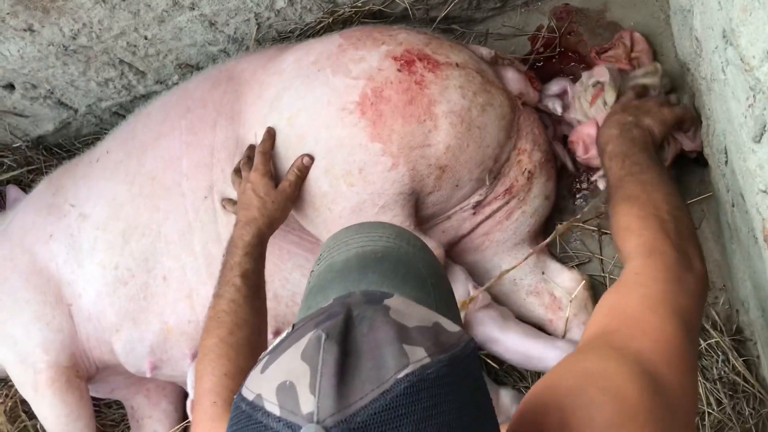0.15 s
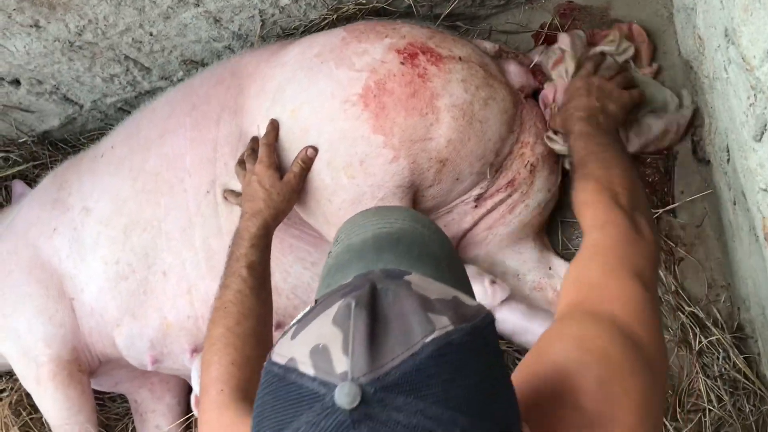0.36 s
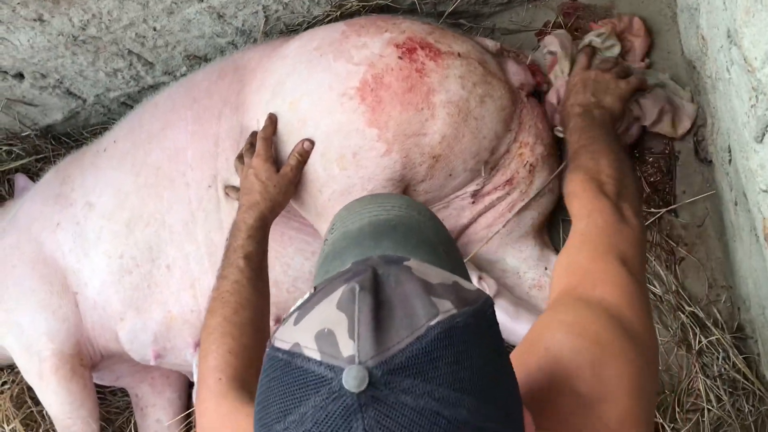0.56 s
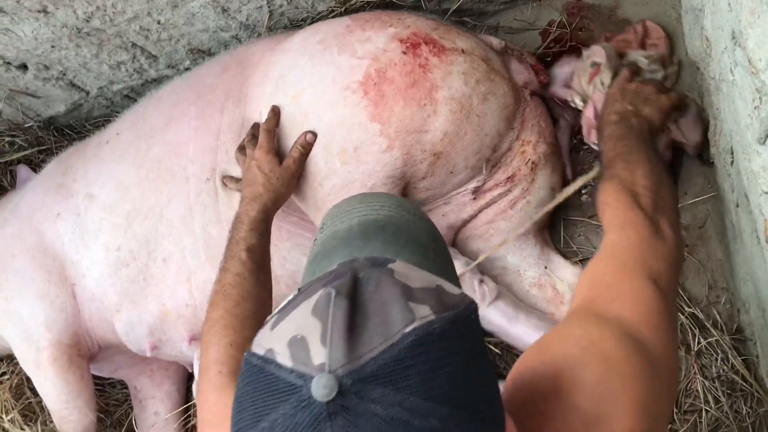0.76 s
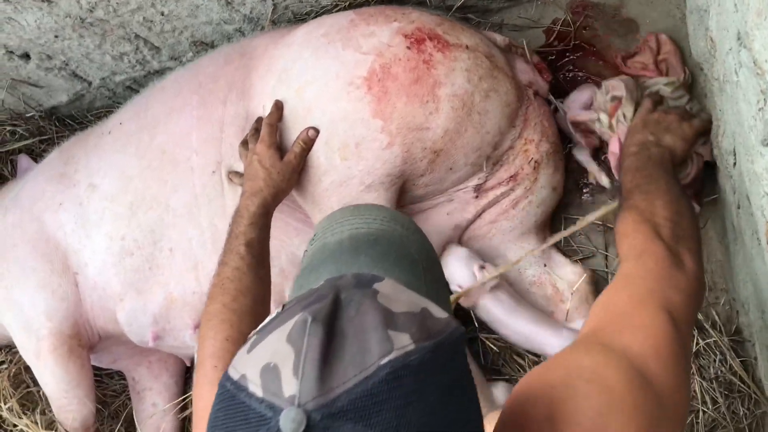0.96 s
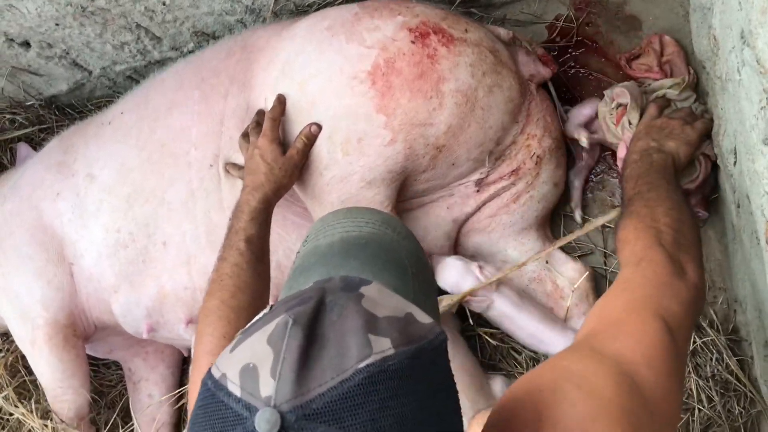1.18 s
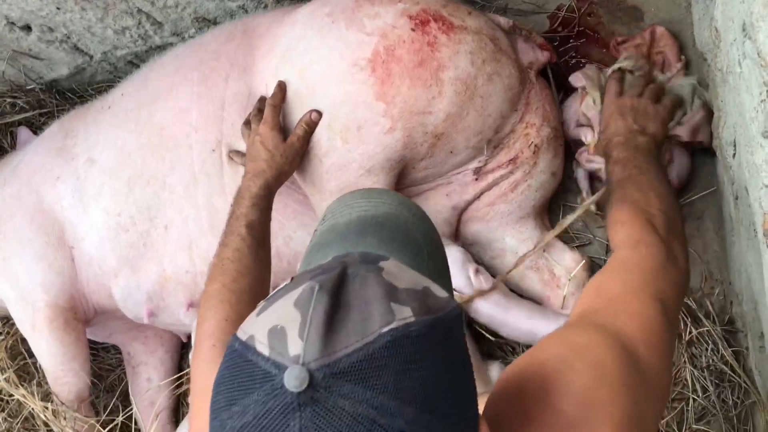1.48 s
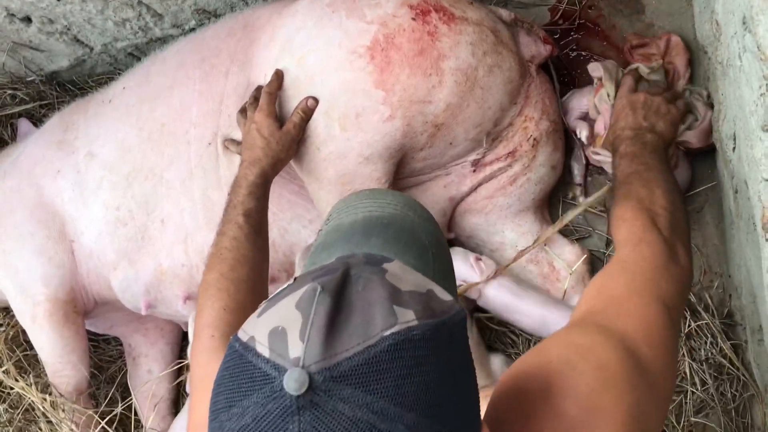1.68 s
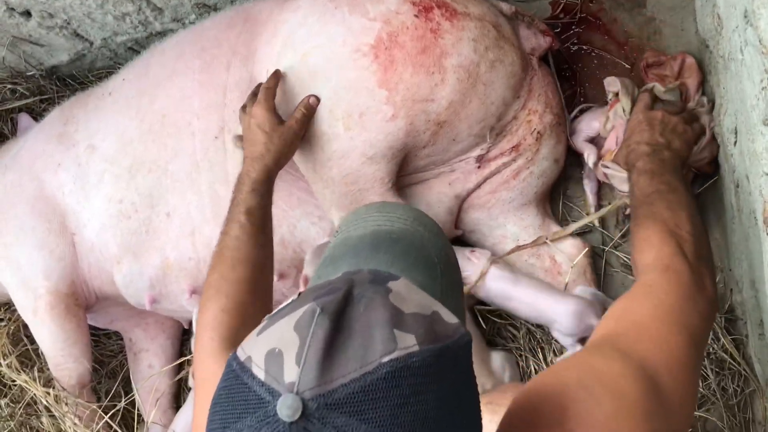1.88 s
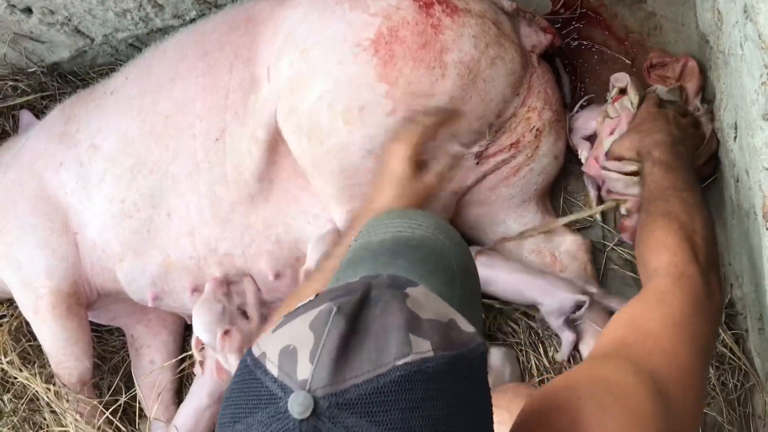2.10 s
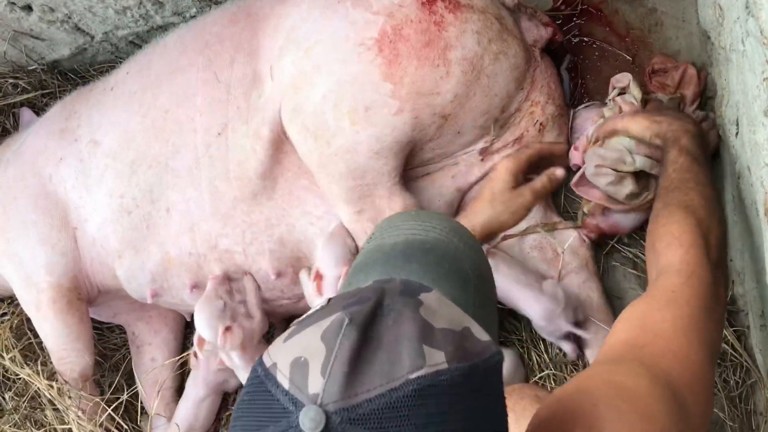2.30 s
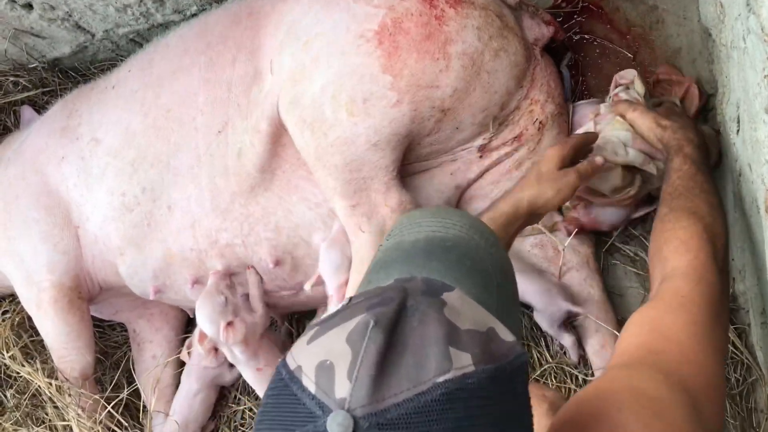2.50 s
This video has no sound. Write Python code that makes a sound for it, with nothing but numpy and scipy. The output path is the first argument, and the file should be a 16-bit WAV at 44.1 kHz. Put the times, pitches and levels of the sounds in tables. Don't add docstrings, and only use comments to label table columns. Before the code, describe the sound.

A sow close by gives short, deep, pulsing grunts about every 0.4 seconds, with soft breaths and two nasal snorts between; straw ticks, piglets smack and peep faintly, over low outdoor rumble in a concrete pen.

```python
import sys
import numpy as np
from scipy import signal
from scipy.fft import rfft, irfft, next_fast_len
from scipy.io import wavfile
from scipy.ndimage import uniform_filter1d, map_coordinates

SR = 44100
rng = np.random.default_rng(int(sys.argv[2]) if len(sys.argv) > 2 else 0)


def nominal_scale(level):
    x = np.asarray(level, float) / 20
    return 10 ** x


def bounce(signal):
    frames = np.transpose(np.atleast_2d(signal))
    limited = np.clip(frames, -1, 1)
    pcm = np.round(limited * 32767).astype(np.int16)
    wavfile.write(sys.argv[1], SR, pcm)


N = 116865
T = np.arange(N) / SR
NOSE_TOP_HZ = 7500


def unit(x):
    return x / np.sqrt(np.mean(x ** 2) + 1e-20)


def along(points, hz):
    f, v = np.transpose(points)
    return np.interp(np.log(hz + 1), np.log(f + 1), v)


def wobble(rate):
    return map_coordinates(rng.standard_normal(int(N * rate / SR) + 4), [T * rate])


def filtered(x, response):
    m = next_fast_len(N + SR // 2)
    return irfft(rfft(x, m) * response(np.fft.rfftfreq(m, 1 / SR)), m)[..., :N]


def through(x, peaks):
    def response(f):
        total = 0
        for k, (center, width, db) in enumerate(peaks):
            cavity = 1j * f * width / (center * center - f * f + 1j * f * width)
            total = total + (-1) ** k * nominal_scale(db) * cavity
        return total
    return filtered(x, response)


def swell(t, length, rise, fall):
    return np.exp(-np.minimum(t / rise - 1, 0) ** 2 - np.maximum((t - length) / fall, 0) ** 2)


def dull(x, hz):
    return signal.sosfilt(signal.butter(6, np.clip(hz, 50, SR / 3), fs=SR, output="sos"), x)


def background():
    # time_s, level_db
    lumps = [(0.0, -18), (0.07, -34), (0.1, -22.5), (0.26, -31), (0.48, -23), (0.56, -34.5), (0.71, -24),
             (0.88, -25), (0.91, -37.5), (1.02, -25.5), (1.39, -34), (1.58, -23.5), (1.84, -39),
             (1.98, -21), (2.13, -41.5), (2.39, -18.5), (2.54, -36.5), (2.65, -28)]
    # pitch_hz, width_hz, level_db
    hums = [(40.6, 22, -8.5), (64.8, 8.8, 9.5), (103.8, 15, -3)]
    # pitch_hz, level_db (per Hz)
    air_color = [(100, 0), (140, -2), (270, -3.5), (350, -17.5), (600, -15.5), (1500, -18), (4000, -22),
                 (8000, -26.5), (15500, -31.5)]
    # pitch_hz, share (0 to 1)
    patchiness = [(1500, 1), (9000, .25)]
    drone = unit(through(through(rng.standard_normal(N), hums), [(59, 64, 0)]))
    even = drone / np.sqrt(np.abs(uniform_filter1d(drone ** 2, SR // 12)) + 0.13)

    hz, _, z = signal.stft(rng.standard_normal(N), SR, nperseg=512)
    field = uniform_filter1d(uniform_filter1d(rng.standard_normal(z.shape), 8, 0), 8, 1)
    frame = np.minimum(np.arange(z.shape[1]), N // 256)
    gusts = 1.77 * wobble(7.56)[::256][frame]
    patches_db = (2.24 * unit(field) + gusts) * along(patchiness, hz)[:, None]
    air = signal.istft(z * nominal_scale(patches_db), nperseg=512)[1][:N]
    air = unit(filtered(air, lambda f: nominal_scale(along(air_color, f)) * (f > 60)))
    return nominal_scale(np.interp(T, *np.transpose(lumps))) * unit(even) + nominal_scale(-41.5) * air


def gate():
    # start_s, length_s, pitch_hz, level_db
    tones = [
        (.48, .12, 1960, -54),
        (.5, .12, 2480, -58),
        (2.44, .12, 1315, -51),
        (2.4, .15, 1545, -48),
        (2.13, .07, 1180, -52),
        (2.22, .06, 2180, -54),
    ]
    out = np.zeros(N)
    for s, length, hz, db in tones:
        out += nominal_scale(db + wobble(15)) * swell(T - s, length, .015, .02) * np.sin(2 * np.pi * hz * T)
    return out


def straw():
    # start_s, peak_db
    snaps = [(0.167, -18), (0.3192, -20), (0.9243, -18), (1.3563, -38), (1.3773, -34), (1.5638, -18),
             (1.5995, -22), (1.723, -22), (1.7517, -20.5), (1.797, -18), (1.925, -18), (2.0278, -17.5),
             (2.2613, -28), (2.3094, -16.5), (2.587, -20)]
    # start_s, length_s, level_db
    moves = [
        (0, 0.0045, -38),
        (0.17, 0.224, -50),
        (1.547, 0.043, -53),
        (1.72, 0.071, -52),
        (1.923, 0.059, -44),
        (2.09, 0.11, -54),
        (2.264, 0.099, -55),
        (2.494, 0.076, -52),
    ]
    t60, bright_hz, crackles_per_s, crackle_db = 0.022, 8060, 245, -53.5
    happens = rng.random(N) < crackles_per_s / SR * nominal_scale(6 * wobble(12))
    ticks = happens * nominal_scale(crackle_db + 2 * rng.exponential(size=N))
    for s, db in snaps:
        ticks[round(s * SR)] += nominal_scale(db - 15.5)
    loudness = signal.fftconvolve(ticks, nominal_scale(-60 * T[:SR // 20] / t60))[:N]
    loudness = loudness + sum(nominal_scale(db) * swell(T - s, length, 0.0025, 0.016) for s, length, db in moves)
    return filtered(loudness * rng.standard_normal(N),
                    lambda f: (1j * f / bright_hz / (1 + 1j * f / bright_hz)) ** 2)


def peeps():
    # start_s, length_s, pitch_hz, level_db
    calls = [
        (.222, .022, 1080, -47),
        (.61, .04, 4700, -49),
        (.61, .03, 3000, -50),
        (.612, .035, 2120, -49),
        (.692, .012, 1540, -41),
        (.786, .006, 4750, -40),
        (.9255, .003, 4050, -41),
    ]
    noise = rng.standard_normal((len(calls), N))
    out = np.zeros(N)
    for breath, (s, length, hz, db) in zip(noise, calls):
        width = .06 * hz
        tone = through(through(breath, [(hz, width, 0)]), [(hz, 2 * width, 0)])
        out += nominal_scale(db) * swell(T - s, length, 0.0027, 0.0035) * unit(tone)
    return out


def smacks():
    # start_s, peak_db, low_hz, high_hz, t60_s (time to fade by 60 dB)
    pops = [
        (0.0772, -28, 1690, 3350, 0.0095),
        (0.1446, -26.5, 2400, 3300, 0.005),
        (0.1521, -27, 1730, 2760, 0.0092),
        (.156, -39, 1700, 1660, 0.019),
        (0.2117, -35.5, 2700, 3130, 0.011),
        (0.265, -39, 1210, 2660, 0.015),
        (0.608, -28, 1720, 3120, 0.0096),
        (0.9258, -25, 2150, 3330, 0.02),
        (1.381, -33.5, 1610, 3270, 0.0096),
        (2.195, -37, 845, 1130, 0.026),
    ]
    out, t = np.zeros(N + SR), T[:SR // 20]
    for s, db, hz, upper_hz, t60 in pops:
        ring = np.sin(2 * np.pi * hz * t) + nominal_scale(-2) * np.sin(2 * np.pi * upper_hz * t)
        crack = np.diff(dull(rng.standard_normal(len(t) + 1), 4200)) * 3
        ring += .7 * crack * nominal_scale(-60 * t / t60)
        out[round(s * SR):][:len(t)] += ring * nominal_scale(db - 60 * t / t60) * (1 - np.exp(-t / 0.000087))
    return out[:N]


def breaths():
    # middle_s, level_db
    murmurs = [
        (0.028, -45.5),
        (.2, -52),
        (.6, -43),
        (0.98, -42.5),
        (1.4, -54),
        (1.78, -47),
        (2.14, -40.5),
        (2.53, -43),
        (2.62, -34.5),
    ]
    # pitch_hz, width_hz, level_db
    chest_cavities = [(274, 66, -1), (192, 64, -3.5)]
    # start_s, length_s, level_db
    snort_times = [
        (1.079, 0.1, -33),
        (2.563, 0.072, -36),
    ]
    # pitch_hz, width_hz, level_db
    nose = [(1100, 300, -4), (1715, 90, 10), (2620, 200, 2), (3350, 300, 2), (4750, 150, -4),
            (5530, 300, -6), (6400, 200, -12), (7600, 300, -13)]
    sag = 0.92
    soft = sum(nominal_scale(db) * np.exp(-((T - s) / 0.076) ** 2) for s, db in murmurs)
    snort = sum(nominal_scale(db) * swell(T - s, length, .022, .025) for s, length, db in snort_times)
    late = sum(np.clip((T - s) / length, 0, 1) * (abs(T - s) < .2) for s, length, db in snort_times)
    noise = rng.standard_normal((2, N))
    nose_air = dull(noise[1], NOSE_TOP_HZ)
    high, low = [unit(through(nose_air, [(hz * ratio, width, db) for hz, width, db in nose]))
                 for ratio in (1 / sag ** .5, sag ** .5)]
    murmur = soft * unit(through(noise[0], chest_cavities))
    return murmur + snort * nominal_scale(1.3 * wobble(59.07)) * ((1 - late) * high + late * low)


def grunts():
    # first_open_pulse_s, pulse_period_s, throat_scale (cavity pitches times this)
    timing = [
        (-.1115, .0225, 1),
        (.3198, .0227, 1.01),
        (.7276, .0223, 1),
        (1.142, .0228, 1),
        (1.5145, .0229, 1.01),
        (1.9161, .0221, .95),
        (2.3077, .0222, .95),
    ]
    # length_s (to closing), chest_db, throat_db, first_pulse_db (under full), throat_closing_s
    shapes = [
        (0.095, -23.5, -29, -8, 0.079),
        (0.092, -24, -33, -13, 0.067),
        (0.072, -24, -34.5, -2.5, 0.038),
        (.075, -20, -33, -10, 0.047),
        (0.093, -21.5, -31, -14.5, 0.073),
        (0.078, -19, -30.5, -3.5, 0.061),
        (0.072, -20.5, -31, -4, 0.047),
    ]
    # pitch_hz, width_hz, level_db
    throat_cavities = [(470, 150, -11.5), (857, 106, 1.5), (1303, 240, -5.5), (1730, 456, -8.5),
                       (2225, 224, -7), (2558, 200, -7.5), (3034, 134, -5.5), (3434, 150, -9),
                       (4670, 210, -6)]
    # pitch_hz, width_hz, level_db
    belly_cavities = [(206.5, 27, -3), (91.7, 8.9, -1.5), (372, 29, -5.5)]
    jitter_s, scatter_db, release_s = .0012, 1.2, 0.016
    run_up_db_per_s, open_db_per_s, close_db_per_s, shut_db = 230, 400, 200, -10
    chest_share = 0.17
    ring_hz, sag_hz_per_s, ring_t60, ring_rise_s, ring_scatter = 291, 150, .2, .0015, .025

    chest, ring, voice, steady = np.zeros(N), np.zeros(N), np.zeros(N), np.zeros(N)
    steady[::SR // 44] = 1
    t = T[:SR // 10]
    puff = np.exp(-t / .012) * (1 - np.exp(-t / .002))
    noise = rng.standard_normal(N) * nominal_scale(3 * wobble(250)) / np.linalg.norm(puff)

    def rasped(pulses, db):
        return pulses + nominal_scale(db) * noise * signal.fftconvolve(pulses, puff)[:N]

    def strength(peaks):
        return np.std(through(steady, peaks))

    for (s, period, scale), (length, chest_db, throat_db, first_db, closing) in zip(timing, shapes):
        chance = rng.standard_normal((12, 3))
        t = np.arange(-4, 8) * period
        jitter = jitter_s * chance[:, 0] * (t > 2.5 * period)
        at = np.round((s + t + jitter) * SR).astype(int)
        ok = at >= 0
        size = nominal_scale(scatter_db * chance[:, 1])
        lag_db = np.minimum(first_db + open_db_per_s * t, 0)

        close_db = close_db_per_s * np.maximum(t - closing, 0) * (1 + (t > length))
        throat = np.zeros(N)
        throat[at[ok]] = (size * nominal_scale(throat_db + lag_db + shut_db * (t < 0) - close_db))[ok]
        cavities = [(hz * scale, width, db) for hz, width, db in throat_cavities]
        voice += through(rasped(throat, 3.5), cavities)

        fade = np.exp(-np.maximum((t - length) / release_s, 0) ** 2)
        low = size * fade * nominal_scale(chest_db + chest_share * lag_db + run_up_db_per_s * np.minimum(t, 0))
        chest[at[ok]] += low[ok]

        n = np.arange(max(at[0], 0), at[-1])
        k = np.searchsorted(at, n, "right") - 1
        since = (n - at[k]) / SR
        hz = (ring_hz - sag_hz_per_s * t) * (1 + ring_scatter * chance[:, 2])
        shape = nominal_scale(-60 * since / ring_t60) * (1 - np.exp(-since / ring_rise_s))
        ring[n] += 2 * low[k] * shape * np.sin(2 * np.pi * hz[k] * since)

    belly = nominal_scale(-8) * through(rasped(chest, -6), belly_cavities) / strength(belly_cavities)
    mouth = dull(voice, 3700) + nominal_scale(-19) * dull(voice, NOSE_TOP_HZ)
    return dull(ring + belly, 420) + mouth / strength(throat_cavities)


def pen(x):
    # pitch_hz, t60_s
    fading = [(200, 0.29), (2000, 0.18), (8000, 0.078)]
    hz, t, z = signal.stft(rng.standard_normal(SR // 3), SR, nperseg=256)
    tail = signal.istft(z * nominal_scale(-60 * t / along(fading, hz)[:, None]), SR, nperseg=256)[1]
    return signal.fftconvolve(np.pad(x, (200, 0)), tail / np.linalg.norm(tail))[:N]


def scene():
    near = grunts() + breaths() + smacks() + straw() + peeps()
    to_walls = filtered(near, lambda f: 1 - 0.64 / (1 + (f / 450) ** 4))
    return (near + nominal_scale(-8.5) * pen(to_walls) + gate() + background())[None]


def band_limit(x):
    return signal.sosfilt(signal.butter(12, 16650, fs=SR, output="sos"), x)


def record(dry):
    heard = filtered(dry, lambda f: 1 - 0.52 * np.exp(-((f - 10420) / 300) ** 2) - (f > 15730))
    heard = heard / (1 + np.abs(heard / .62) ** 4) ** .25
    return band_limit(heard)


dry = scene()
out = record(dry)
bounce(out)
```